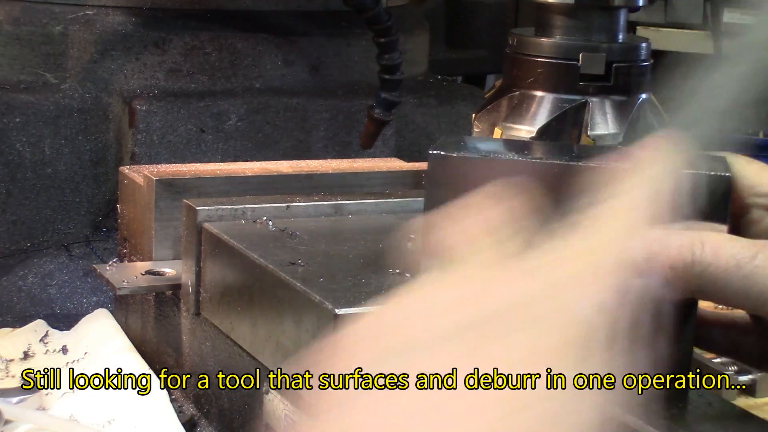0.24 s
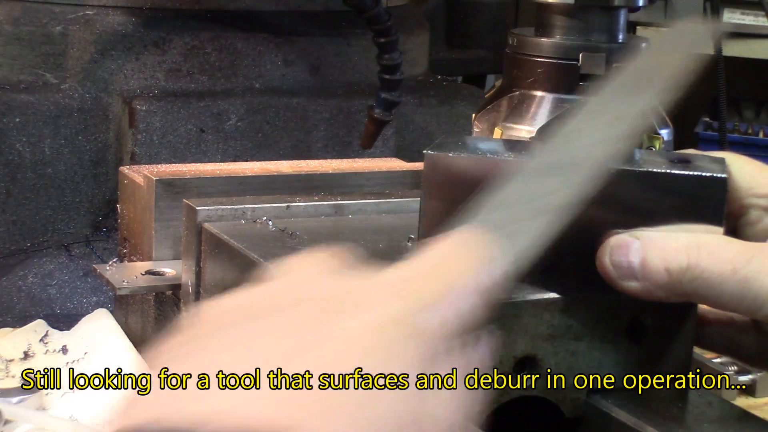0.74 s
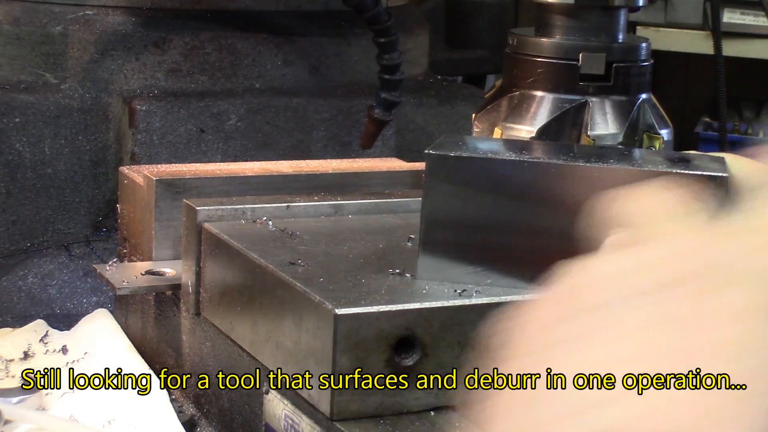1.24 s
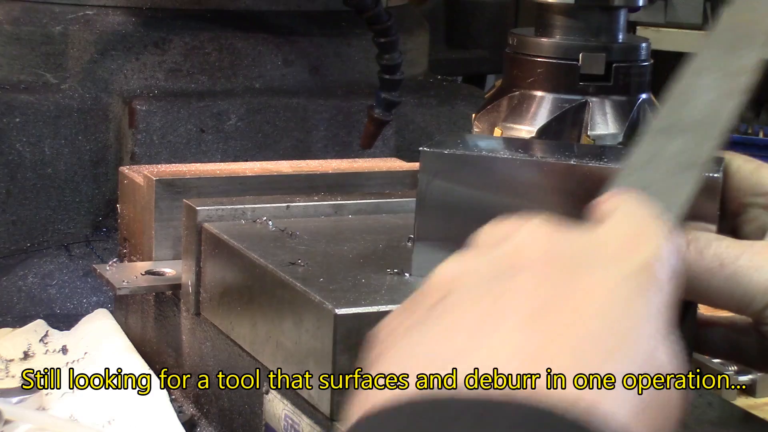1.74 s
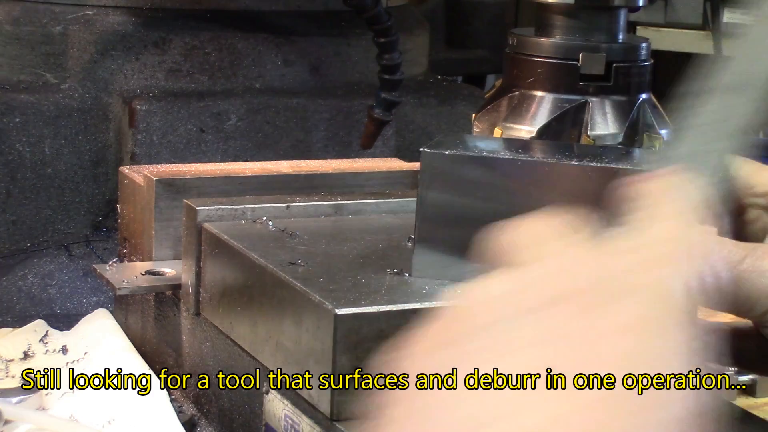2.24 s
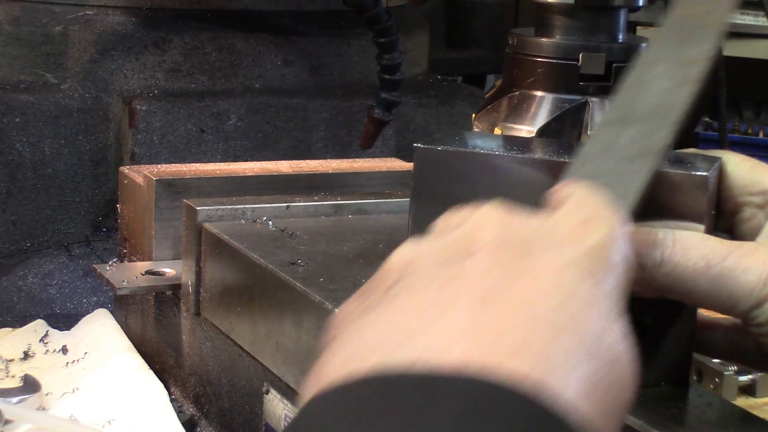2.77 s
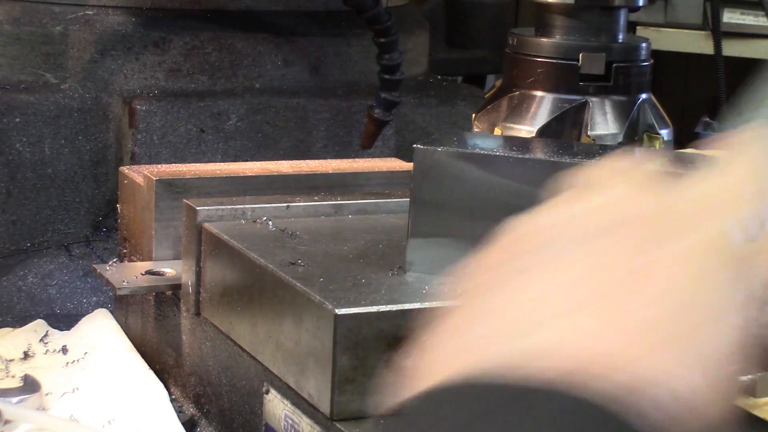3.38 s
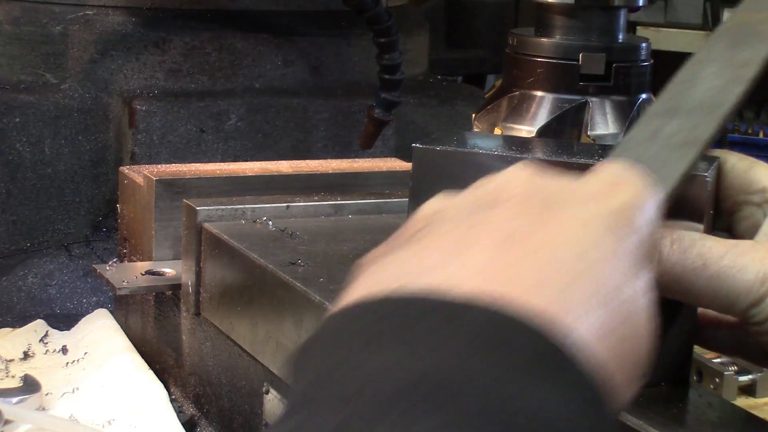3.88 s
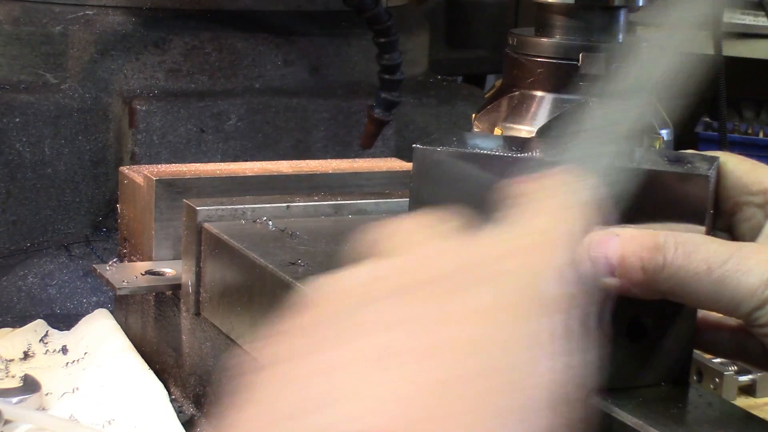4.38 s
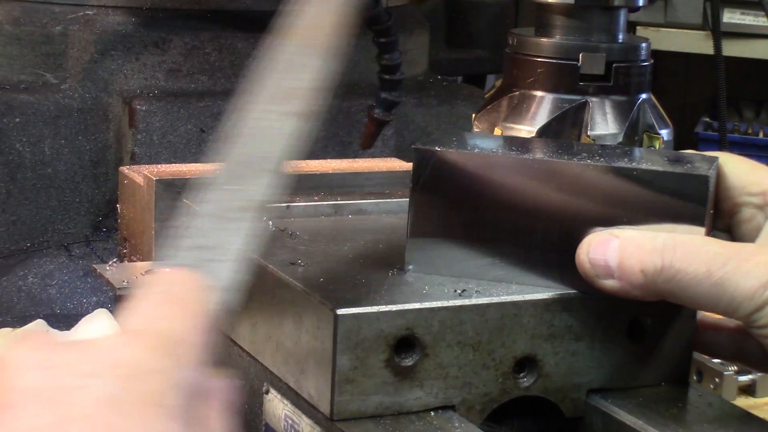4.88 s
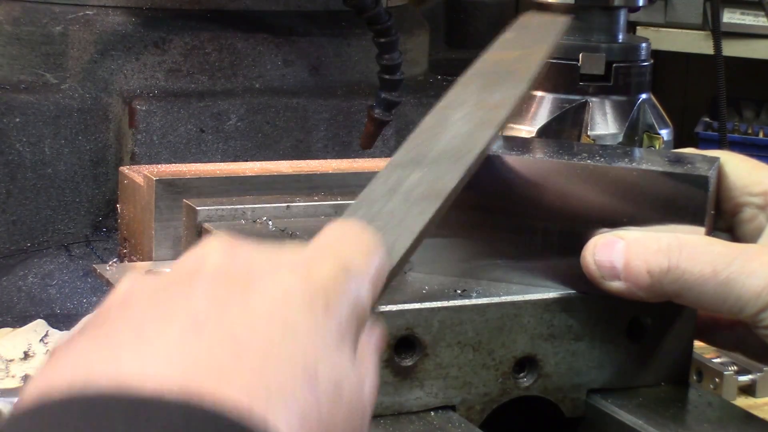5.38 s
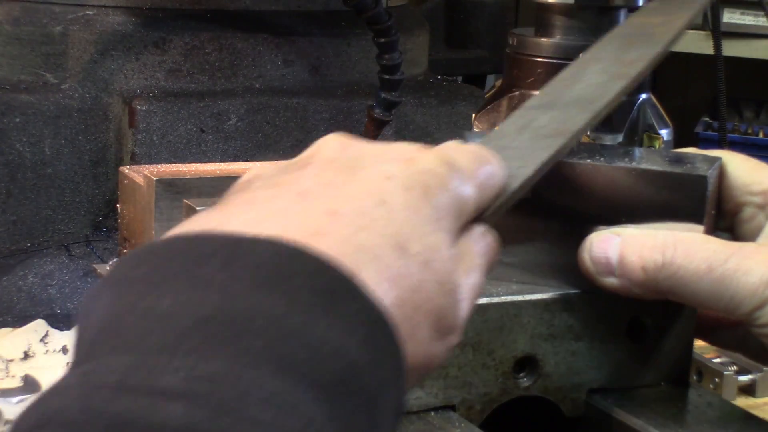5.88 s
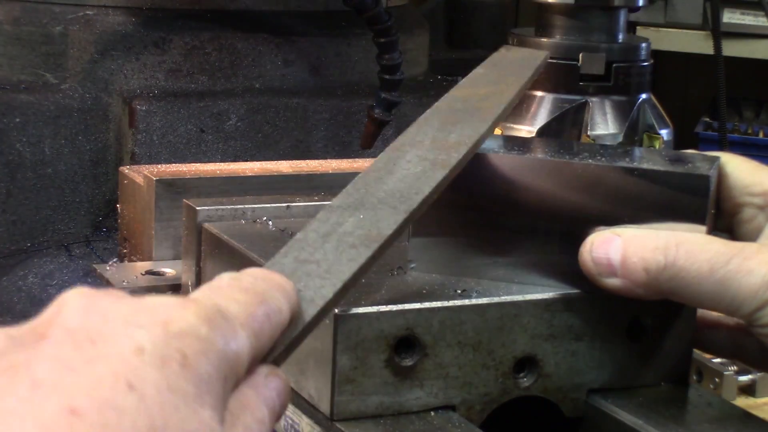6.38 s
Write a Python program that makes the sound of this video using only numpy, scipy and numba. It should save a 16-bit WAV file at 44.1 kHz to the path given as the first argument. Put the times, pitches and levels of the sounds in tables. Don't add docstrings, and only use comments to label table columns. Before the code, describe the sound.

A hand file clicks onto a steel block's edge and scrapes along it in short, dry, raspy strokes over a low workshop hum.

```python
import sys
import numpy as np
from scipy import signal
from scipy.fft import rfft, irfft
from scipy.io import wavfile
from scipy.ndimage import uniform_filter1d, minimum_filter1d
from numba import njit

SR = 44100
rng = np.random.default_rng(int(sys.argv[2]) if len(sys.argv) > 2 else 0)


def field_ratio(decibels):
    return 10 ** (np.asarray(decibels, dtype=float) / 20)


def generate_wav(sig):
    pcm = np.round(np.clip(np.atleast_2d(sig).T, -1, 1) * 32767).astype(np.int16)
    wavfile.write(sys.argv[1], SR, pcm)


N = 291929


def rms_one(x):
    return x / np.sqrt(np.mean(x ** 2) + 1e-20)


def at_hz(points, hz):
    table_hz, values = np.array(points)[:, :2].T
    return np.interp(np.log(hz), np.log(table_hz), values)


def drift(rate):
    r = np.exp(-80 * np.pi * rate / SR)
    slow = signal.lfilter([1], [1, -2 * r, r * r], rng.standard_normal(N // 40 + 2002))[2000:]
    return np.interp(np.arange(N) / 40, np.arange(len(slow)), rms_one(slow))


def coloured(x, points):
    hz = np.maximum(np.arange(N // 2 + 1) * SR / N, 1)
    return irfft(rfft(x) * field_ratio(at_hz(points, hz)), N)


def band_pass(x, low, high):
    return signal.sosfilt(signal.butter(2, [low, high], "band", fs=SR, output="sos"), x)


@njit
def resonate(x, hz, r, sr):
    out, y1, y2 = np.zeros(len(x)), 0., 0.
    for i in range(len(x)):
        w = 2 * np.pi * hz[i] / sr
        out[i] = np.sin(w) * x[i] + 2 * r * np.cos(w) * y1 - r * r * y2 + 1e-18
        y1, y2 = out[i], y1
    return out


def decay_per_sample(t60):
    return field_ratio(-60 / (t60 * SR))


def zone_weights(centres, hz):
    return np.array([at_hz(list(zip(centres, row)), hz) for row in np.eye(len(centres))])


def workshop():
    # hz, density_db
    shop = [(12, -39), (20, -3.5), (53, -0.5), (86, -5), (295, -12.5), (330, -14), (745, -15.5),
            (1100, -18), (1780, -18.5), (2630, -22), (4120, -22), (13000, -29), (16300, -34)]
    # hz, side_against_mid_db
    side_spread = [(60, -31), (110, -32), (200, -24.5), (380, -21), (700, -23.5), (1290, -24.5),
                   (2380, -18), (4400, -16.5), (8120, -14.5), (15000, -15)]
    mid, side = [coloured(rng.standard_normal(N), shop) for _ in range(2)]
    swell_db = 0.4 * drift(0.66)
    scale = field_ratio(-39 + swell_db) / np.sqrt(np.mean(mid ** 2))
    mains_hz, mains_db = 60, -52.5
    hum = field_ratio(mains_db + 2 * drift(1.1)) * np.sin(2 * np.pi * mains_hz * np.arange(N) / SR)
    return scale * (mid + coloured(side, side_spread) * [[1], [-1]]) + hum


def taps():
    # start_s, lowest_group_peak_db, then second_db, third_db, top_db against it
    tap_rows = [
        (0.4138, -33.5, 10, 2, 8),
        (1.3981, -35, -2, 12, 19.5),
        (1.428, -41, -3, -7, -19),
        (2.3722, -22, 3, -5, -4),
        (2.3744, -17, 5.5, 8, 12),
        (3.5487, -13.5, 3, 4, 0.5),
        (3.5668, -19, 1, 5.5, 1),
        (5.0542, -41.5, 8, -5, -1),
        (6.3128, -19.5, 4.5, 2, 3.5),
    ]
    # ring_against_crack_db, fourth_against_third_group_db
    grips = [(-3, -12), (0, -19), (-1, -8), (-3, -2), (-0.5, 3.5), (-4, -2), (-2, -4), (-2.5, 2),
             (-3.5, -0.5)]
    tap_zones_hz = [2700, 3900, 5500, 7100, 9000, 11500]
    free_hz = [1600, 2380, 2580, 2800, 3050, 3600, 3950, 4260, 4600, 5430, 5990, 6988, 7257, 8640, 8796,
               10100, 10600, 12440, 14000, 14850]
    # level_db, t60_s
    free_modes = [(-19, 0.05), (-23, 0.066), (-7.5, 0.11), (17, 0.0062), (-25, 0.049), (2, 0.02),
                  (1, 0.031), (-9.5, 0.053), (0, 0.018), (1, 0.025), (-5, 0.035), (3.5, 0.027), (-9, 0.027),
                  (8.5, 0.012), (0.5, 0.039), (-25, 0.018), (-6, 0.02), (4, 0.016), (-19, 0.01), (-8, .012)]
    airy_db = 0.5
    rows, (ring_db, fourth_db) = np.array(tap_rows), np.transpose(grips)
    at = np.round(rows[:, 0] * SR).astype(int)
    relative_db = np.c_[np.zeros(len(rows)), rows[:, 2:4], rows[:, 3] + fourth_db, rows[:, 4],
                        rows[:, 2:].mean(axis=1) + airy_db]
    group_db = rows[:, 1:2] + relative_db

    shape = (len(at), len(free_modes))
    luck_db, late_s = rng.normal(0, 2.8, shape), rng.uniform(0, 0.0011, shape)
    t = np.arange(500) / SR
    chatter = rng.standard_normal((len(at), 500)) * (1 - np.exp(-t / 0.0003)) * np.exp(-t / 0.0022)
    rings, cracks = np.zeros((2, N))
    for k, (hz, (level_db, t60)) in enumerate(zip(free_hz, free_modes)):
        blow_db = group_db @ zone_weights(tap_zones_hz, hz) + level_db + luck_db[:, k] + ring_db
        drive = np.zeros(N)
        drive[at + (late_s[:, k] * SR).astype(int)] = field_ratio(blow_db)
        rings += resonate(drive * (-1) ** k, np.full(N, float(hz)), decay_per_sample(t60), SR)
    rings = signal.sosfilt(signal.butter(2, 900, "high", fs=SR, output="sos"), rings)

    crack_hz = [2050, 3200, 4800, 6400, 7900, 10500, 15300]
    for k, (levels_db, low, high) in enumerate(zip(group_db.T, crack_hz, crack_hz[1:])):
        crack = np.zeros(N)
        for i, burst, level_db in zip(at, chatter, levels_db):
            crack[i:i + 500] += field_ratio(level_db + 2) * burst * np.sqrt(2000 / (high - low))
        cracks += (-1) ** k * band_pass(crack, low, high)

    jolt, table_hz = np.zeros(N), 65.6
    jolt[at] = field_ratio(-20.5 + 0.5 * group_db.max(axis=1))
    return rings + resonate(jolt, np.full(N, table_hz), decay_per_sample(0.06), SR), cracks


def machine_bed(x, t60, wet_db):
    t = np.arange(int(0.4 * SR)) / SR
    tail = rng.standard_normal(len(t)) * field_ratio(-60 * t / t60) * np.clip(t / 0.0096, 0, 1)
    tail = signal.lfilter([0.4], [1, -0.6], tail)
    return field_ratio(wet_db) * signal.fftconvolve(x, tail / np.sqrt(np.sum(tail ** 2)))[:N]


def pressure_db(rows, rise_db_per_s, fall_db_per_s):
    s, hold, db = np.array(rows)[:, :3, None].transpose(1, 0, 2)
    t = np.arange(0, N, 32) / SR
    rise = rise_db_per_s * np.maximum(s - t, 0)
    fall = fall_db_per_s * np.maximum(t - s - hold, 0)
    return np.maximum(db - rise - fall, -150)


def contact():
    # start_s, hold_s, low_modes_db, brightness_db, favoured_hz
    cuts = [(0.635, 0.03, -25, -0.5, 3350), (0.682, 0.021, -26, 1, 3930), (0.737, 0.044, -27, 2.5, 3800),
            (0.806, 0.034, -27, -5.5, 2850), (1.691, 0.042, -31.5, -2, 3250), (1.88, 0.063, -29, -7, 3070),
            (2.718, 0.052, -35, 1, 2470), (2.775, 0.06, -33, -6, 2450), (3.044, 0.033, -25, -8, 2800),
            (3.778, 0.039, -28, -3.5, 2980), (3.827, 0.13, -32.5, -3, 2980), (3.97, 0.032, -23, -10, 2980),
            (5.289, 0.044, -29.5, -8.5, 2650), (5.692, 0.081, -32.5, -2.5, 3030),
            (6.519, 0.014, -28.5, -6.5, 3100)]
    # start_s, hold_s, low_modes_db, brightness_db, favoured_hz
    drags = [(0.624, 0.017, -36, -9, 3000), (.71, .02, -33, -7, 3720), (0.861, 0.045, -33, -2.5, 3660),
             (0.938, 0.073, -38.5, -5, 3000), (1.474, 0.11, -56.5, 7, 3300), (1.596, .05, -44, 4, 3130),
             (1.666, .04, -38.5, 7.5, 3300), (1.766, 0.12, -42, 0, 3370), (2.454, 0.032, -45, -3, 3400),
             (2.516, 0.021, -48.5, 10, 3400), (2.606, .04, -56, 13, 3560), (2.66, 0.056, -46.5, 6, 3000),
             (2.862, 0.14, -45.5, 2.5, 2600), (2.996, .03, -37.5, -11, 2820),
             (3.622, 0.063, -35, -2.5, 3040), (3.702, .06, -34.5, 3, 3600), (3.946, .03, -35.5, 6, 3120),
             (4.033, 0.028, -36.5, -11, 2970), (5.237, .04, -34.5, -12.5, 2900),
             (5.346, 0.028, -42, 11, 2660), (5.784, 0.06, -43.5, 0.5, 2920), (5.874, 0.065, -47.5, 0, 3300),
             (6.469, .03, -39.5, -7, 3160), (6.552, .08, -34.5, -4, 2930)]
    pushes_db = np.r_[pressure_db(cuts, rise_db_per_s=459, fall_db_per_s=320),
                      pressure_db(drags, rise_db_per_s=302, fall_db_per_s=250)]
    power = field_ratio(2 * pushes_db)
    total = power.sum(axis=0)
    controls = [10 * np.log10(total), *(np.array(cuts + drags)[:, 3:].T @ power / total)]
    return [np.interp(np.arange(N) / 32, np.arange(len(c)), c) for c in controls]


def teeth(per_s, spread_db, clump_db):
    # start_s, above_steady_bite_db
    catches = [(.628, -1), (.701, 7), (1.647, 3), (3.705, 1), (3.718, -5), (0.657, 6), (0.673, 7),
               (.691, 5), (.696, 9), (0.742, 8), (0.761, 10.5), (.771, 11), (0.778, 10.5), (.797, 5),
               (1.719, 0), (2.717, 5), (3.037, -9), (3.618, 11), (3.764, 2.5), (3.787, 12.5), (4.003, -8),
               (4.066, 8.5), (5.299, 6), (5.324, 2), (6.461, 12.5), (6.4905, 15), (6.512, 7), (6.522, 3)]
    sizes = field_ratio(spread_db * np.minimum(rng.exponential(1, N), 5)) * rng.choice([-1, 1], N)
    judder_db = clump_db * (drift(20) + 0.29 * drift(140))
    bites = rms_one(sizes * (rng.random(N) < per_s / SR) * field_ratio(judder_db))
    t, bursts = np.arange(900) / SR, rng.standard_normal((len(catches), 900))
    for (s, extra_db), burst in zip(catches, bursts):
        bites[round(s * SR):][:900] += field_ratio(extra_db) * burst * np.exp(-t / 0.0028)
    return bites


def low_modes(bites):
    # start_s, hold_s, level_db, pitch_hz, glide_hz_per_s
    songs = [(0.67, .045, -51, 2120, -1500), (0.724, 0.034, -36.5, 1520, -100),
             (0.784, 0.043, -46.5, 785, -300), (1.683, 0.061, -36.5, 2140, 800),
             (2.762, 0.097, -37.5, 2290, -800), (3.755, 0.029, -40, 2060, -500),
             (3.83, 0.042, -34, 2210, 500), (3.966, .04, -46.5, 890, 500),
             (0.861, .025, -40.5, 1280, -1500), (0.927, 0.03, -42.5, 1980, 1500),
             (0.957, 0.029, -41, 1420, 1500), (1.015, 0.01, -46, 1310, -500), (1.618, .11, -42, 1606, 300),
             (1.883, 0.07, -41, 1400, 2000), (2.81, .03, -46, 1650, -1500),
             (3.029, 0.071, -41.5, 1520, -2000), (3.622, 0.1, -46, 1540, 300),
             (3.77, .025, -37.5, 1837, -1500), (3.804, .03, -41, 1680, -1500),
             (3.873, 0.1, -41, 1534, -500), (3.972, 0.06, -37.5, 1470, 500),
             (4.025, 0.046, -48, 1450, -1000), (5.3, 0.045, -43.5, 1590, 100),
             (5.695, 0.089, -41.5, 1596, 1200), (6.46, 0.18, -47.5, 1640, -100)]
    out, t = np.zeros(N), np.arange(N) / SR
    r = np.exp(-np.pi * 65 / SR)
    levels_db = pressure_db(songs, rise_db_per_s=498, fall_db_per_s=498)
    for (s, hold, _, hz, glide), db in zip(songs, levels_db):
        near = slice(int((s - 0.1) * SR), int((s + hold + 0.15) * SR))
        drive = field_ratio(np.repeat(db, 32)[:N][near] + 8.5) * bites[near] * np.sqrt(1 - r)
        pitch_hz = hz + glide * np.clip(t[near] - s, -0.03, hold + 0.033)
        out[near] += resonate(drive, pitch_hz, r, SR)
    return out


def strokes():
    zones_hz = [3600, 5500, 7100, 9000]
    held_hz = [2030, 2250, 2450, 2620, 2820, 3050, 3220, 3560, 3720, 3950, 4350, 4860, 5450, 6000, 7000,
               7300, 8550, 8800, 9100, 10100, 10700, 12700, 13700, 14900]
    # width_hz, level_db
    held_modes = [(69, -3.5), (90, -4.5), (90, -2.5), (89, -1.5), (82.5, -10), (80, -43), (79.6, -9.5),
                  (91, -2.5), (90.5, -4.5), (139, -1), (158, -13.5), (88, -23), (200, -1.5), (98, -18),
                  (90.5, 2), (215, -1.5), (199, -9), (143, -3), (218, -8), (280, -7.5), (260, -0.5),
                  (350, -19), (400, -9.5), (220, -10)]
    # hz, density_db
    rasp_spectrum = [(530, -49), (900, 2.5), (2730, 8.5), (8050, 0), (8760, 0), (9530, -1.5),
                     (15100, -10.5), (16000, -55)]
    group_offset_db = [-1.5, -0.5, 0]
    group_follows = [1, 0.9, 0.83]
    low_db, bright_db, favoured_hz = contact()
    bright_hz = 8850 * (1 + 0.008 * drift(7.3))
    upper_db = [low_db + db + share * bright_db for db, share in zip(group_offset_db, group_follows)]
    gains = field_ratio([low_db] + upper_db)
    bites, out = teeth(per_s=8000, spread_db=2.5, clump_db=1.1), np.zeros(N)
    for k, (hz, (width_hz, level_db)) in enumerate(zip(held_hz, held_modes)):
        r = np.exp(-np.pi * np.clip(width_hz, 15, 600) / SR)
        near = np.exp(-(np.log(hz / favoured_hz) / 0.21) ** 2)
        near = near + np.exp(-(np.log(hz / bright_hz) / 0.029) ** 2)
        reach = field_ratio(level_db + 8 * near + 2.3 * drift(12))
        pull = 0.022 if hz < 5000 else 0.007
        centre = hz * (1 + pull * drift(6))
        drive = zone_weights(zones_hz, hz) @ gains * reach * bites * (1 - r) * (-1) ** k
        out += field_ratio(18.5) * resonate(drive, centre, r, SR)

    rasp_hz = [1700, 4800, 6400, 7900, 16500]
    rasp = coloured(bites, rasp_spectrum)
    signed = gains * [[1], [-1], [1], [-1]]
    for gain, low, high in zip(signed, rasp_hz, rasp_hz[1:]):
        band = band_pass(rasp, low, high)
        out += field_ratio(-5.5) * gain * band / np.std(band[:SR // 2])
    return out + low_modes(bites)


def knock():
    # start_s, peak_db, pitch_hz
    blows = [
        (4.681, -23, 838),
    ]
    out = np.zeros(N)
    for s, peak_db, hz in blows:
        t = np.maximum(np.arange(N) / SR - s, 0)
        rings = np.sin(2 * np.pi * hz * t)
        rings += 0.76 * np.sin(2 * np.pi * 1.54 * hz * t) * np.exp(-t / 0.0045)
        rings += 0.21 * np.sin(2 * np.pi * 3.6 * hz * t)
        out += field_ratio(peak_db - 5.5) * rings * (1 - np.exp(-t / 0.00085)) * field_ratio(-60 * t / 0.079)
    return out


def scene():
    (rings, cracks), scrape = taps(), strokes()
    mic_top_hz = 15600
    scrape = signal.sosfilt(signal.ellip(8, 0.5, 50, mic_top_hz, fs=SR, output="sos"), scrape)
    struck = cracks + 0.15 * rings
    scattered = machine_bed(struck, t60=0.2, wet_db=-3.5) + machine_bed(scrape, t60=0.2, wet_db=-34)
    file = rings + cracks + scrape + scattered
    spill = machine_bed(file, t60=0.02, wet_db=-38.5) * [[1], [-1]]
    return file + spill + knock() + workshop()


def roll_off(x):
    return signal.sosfilt(signal.butter(12, 16440, fs=SR, output="sos"), x)


def record(dry):
    t, power = np.arange(N) / SR, np.mean(dry, 0) ** 2
    over_db = np.maximum(10 * np.log10(uniform_filter1d(power, 441) + 1e-12) + 16, 0)
    recovery = 14 * t
    held_db = np.maximum(np.maximum.accumulate(over_db + recovery) - recovery, 0)
    pole = np.exp(-1 / (0.053 * SR))
    duck_db = 0.45 * signal.lfilter([1 - pole], [1, -pole], held_db)

    fast_db = 10 * np.log10(uniform_filter1d(power, size=88) + 1e-12)
    ahead_db = -minimum_filter1d(-fast_db, size=401, origin=-200)
    starved = uniform_filter1d(np.clip((ahead_db - fast_db - 21) / 5, 0, 0.7), size=88)
    treble = signal.sosfiltfilt(signal.butter(2, 3000, "high", fs=SR, output="sos"), dry)
    clipped = np.clip((dry - starved * treble) * field_ratio(-duck_db), -0.9, 0.9)
    top_hz = 16600
    mix = signal.sosfiltfilt(signal.cheby2(10, 42, top_hz, fs=SR, output="sos"), clipped)
    return roll_off(mix)


dry = scene()
out = record(dry)
generate_wav(out)
```